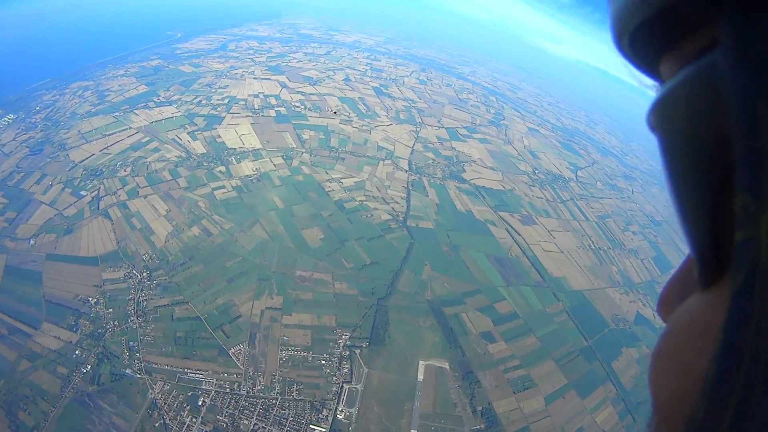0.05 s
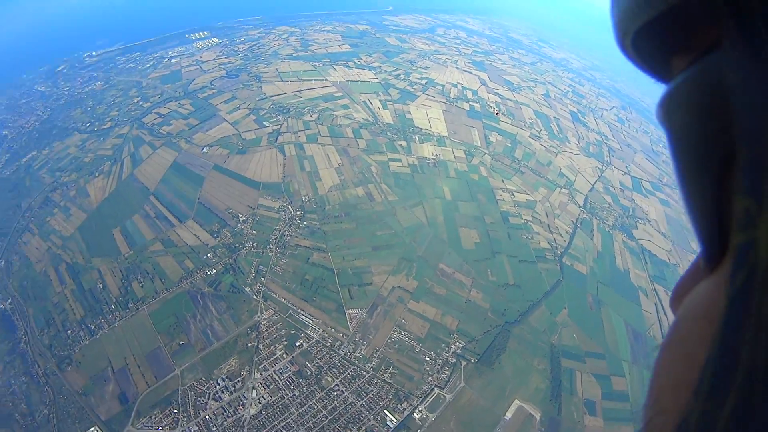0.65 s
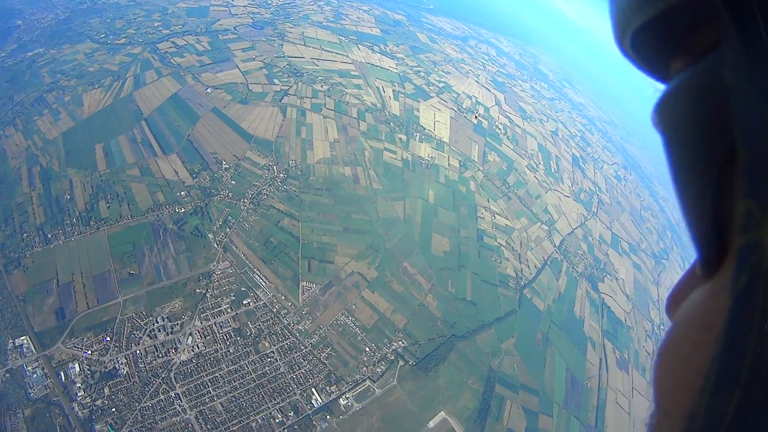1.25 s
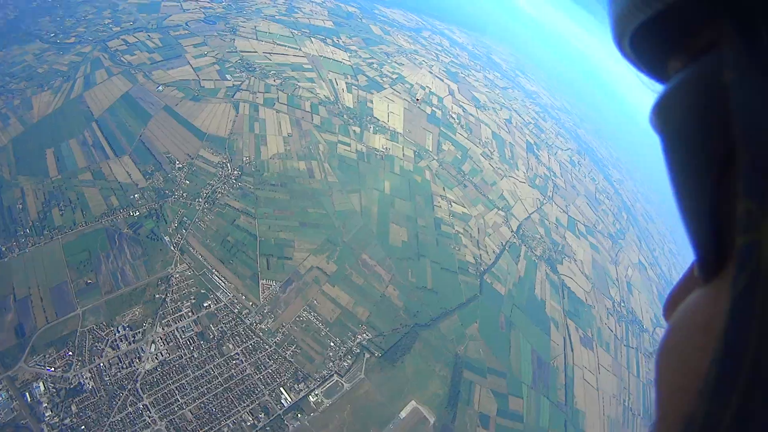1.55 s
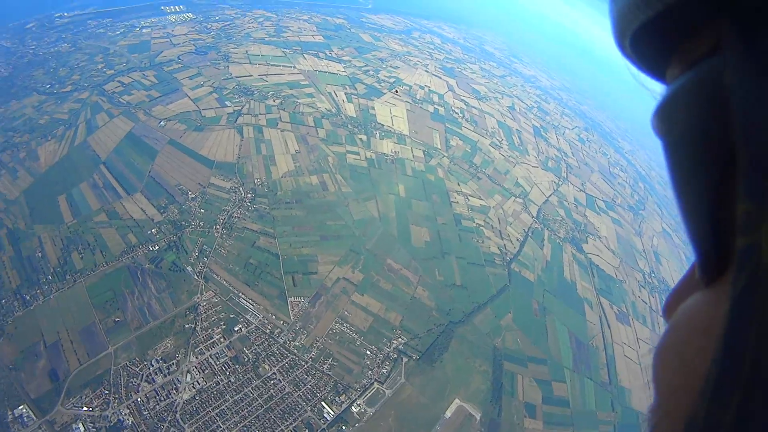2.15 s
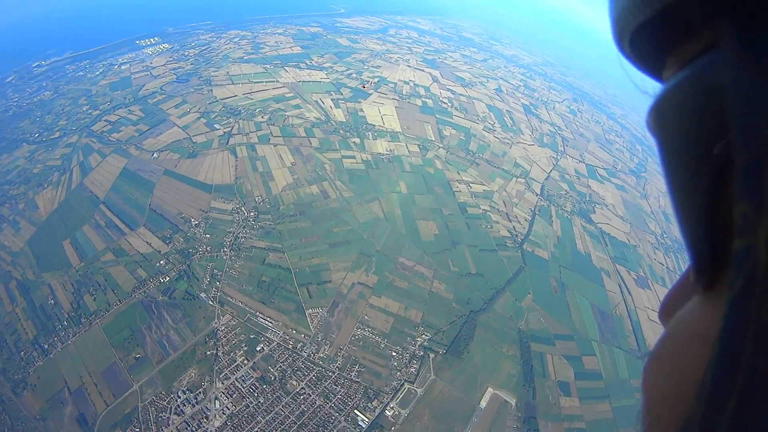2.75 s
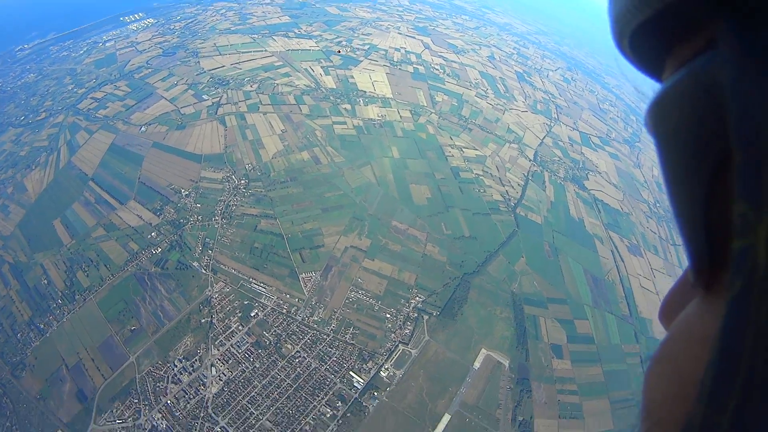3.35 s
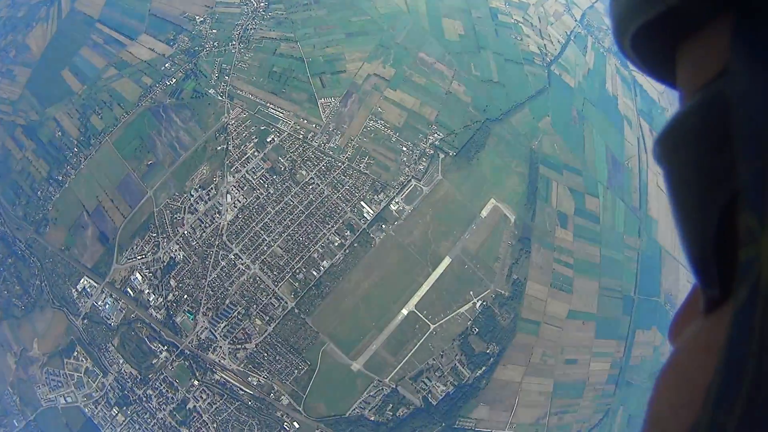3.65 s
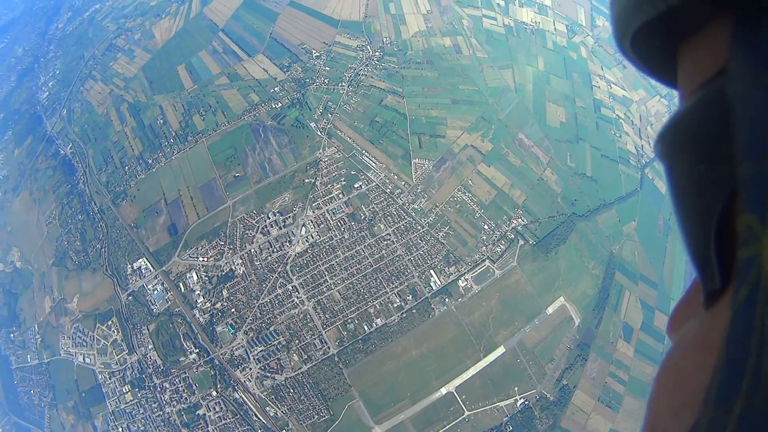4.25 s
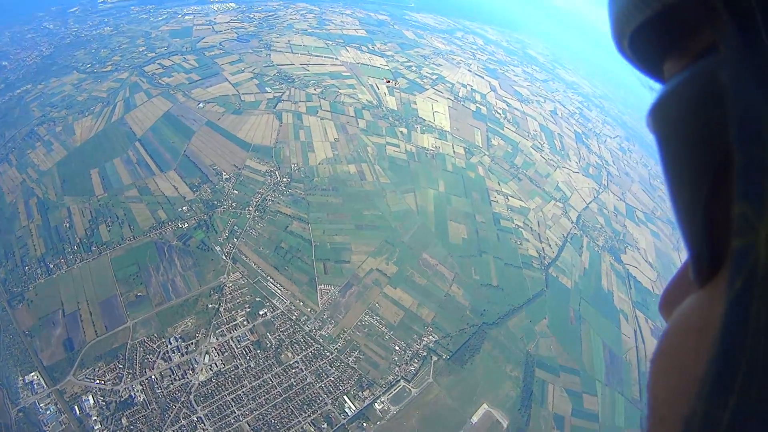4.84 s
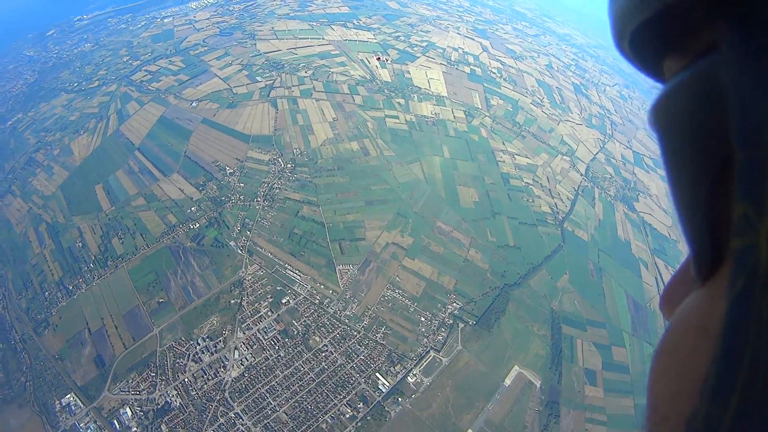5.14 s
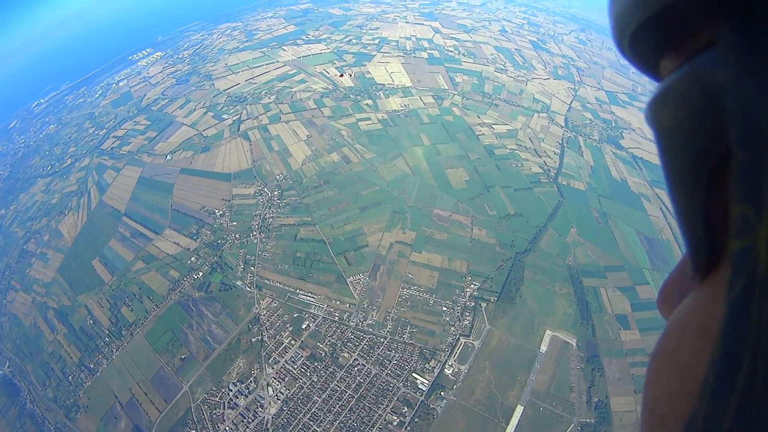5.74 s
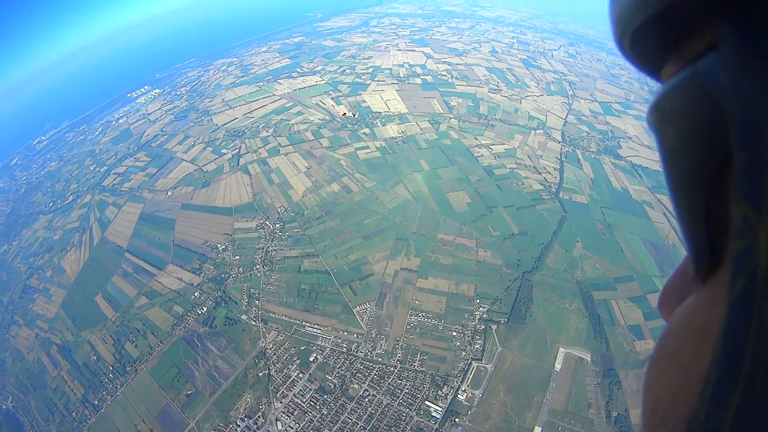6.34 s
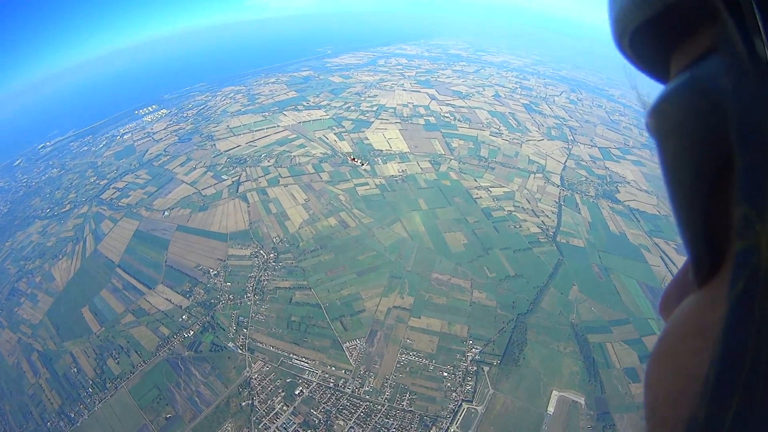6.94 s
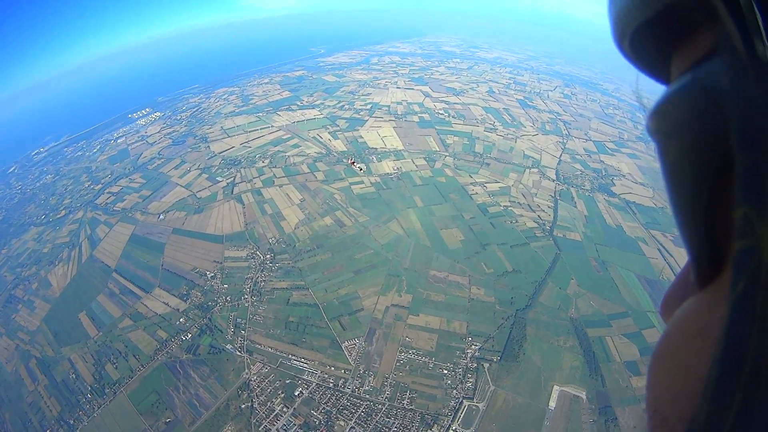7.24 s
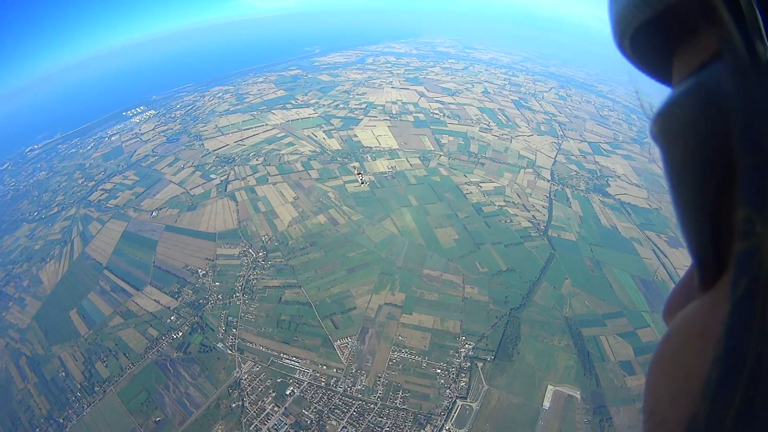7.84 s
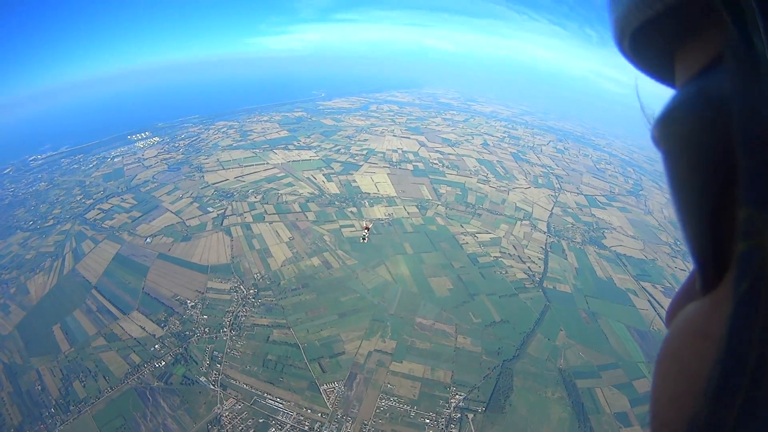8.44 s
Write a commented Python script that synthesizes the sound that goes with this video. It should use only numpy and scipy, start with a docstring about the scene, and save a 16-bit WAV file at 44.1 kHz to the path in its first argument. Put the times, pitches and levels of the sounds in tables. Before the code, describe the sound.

Air tears past a skydiver's helmet in a continuous roar, howling and hissing, with low throbbing that comes and goes.

```python
"""Wind on a helmet in freefall

Air tears past a helmet camera with two microphone ports. A cavity beside them resonates in the flow
and howls near 1.7 kHz. As the head turns, the flow separates into low buffeting and a throbbing wake
of shed vortices. Turbulence keeps up a broad rush, edge noise and hiss throughout."""
import sys
import numpy as np
from scipy import signal
from scipy.fft import irfft
from scipy.io import wavfile
from scipy.ndimage import uniform_filter1d

SR = 44100
rng = np.random.default_rng(int(sys.argv[2]) if len(sys.argv) > 2 else 0)


def generate_wav(signal):
    """Clip the signal to [-1, 1] and save it as 16-bit WAV at the path in sys.argv[1]."""
    frames = np.transpose(np.atleast_2d(signal))
    scaled = np.clip(frames, -1, 1) * 32767
    pcm = np.round(scaled).astype(np.int16)
    wavfile.write(sys.argv[1], SR, pcm)


N = 383229
T = np.arange(N) / SR
HZ = np.maximum(np.arange(N // 2 + 1) * SR / N, 1)


# Lowest cavity resonance: f/Hz, relative level/dB
HOWL_SPECTRUM = [(1100, -21), (1300, -16), (1420, -6.5), (1520, -1), (1740, -1.5), (1870, -4),
                 (2000, -10.5), (2200, -19.5), (2600, -32.5)]
# Strength of the howl: t/s, level/dB
HOWL_ENVELOPE = [(0.0, -19.5), (0.42, -19), (0.54, -14.5), (0.84, -21.5), (0.96, -15.5), (2.1, -17.0),
                 (2.28, -20.5), (2.56, -19.5), (3.22, -20.5), (3.58, -15.5), (4.54, -16.0), (4.64, -23),
                 (4.9, -16.0), (6.4, -15.5), (6.82, -20.5), (7.74, -18.5), (7.82, -21.5), (8.68, -22.5)]

def cavity_howl():
    """Flow-excited resonance: a cavity is blown near saturation, and the helmet shell drones faintly."""
    level_db = over_time(HOWL_ENVELOPE)
    broad = rms_one(signal.hilbert(irfft(random_bins() * spectral_gain(HOWL_SPECTRUM), N)))
    # the harder it is blown, the more it gathers on one note
    core = from_db(level_db + 5) * rms_one(resonance(centre_hz=1705, width_hz=150))
    cavity = at_ports(saturate(broad + core, ceiling=3.2), lead_rad=0.96, left_db=2.5)
    shell = at_ports(resonance(centre_hz=391.5, width_hz=67), lead_rad=0.57, left_db=1)
    return from_db(level_db) * (cavity + from_db(-24) * shell)


# Spells of separated flow: start/s, end/s, onset time/s, share of full separation
SEPARATIONS = [(-0.1, 0.476, 0.05, 0.91), (0.67, 0.98, 0.21, 0.89), (0.98, 1.535, 0.1, 0.32),
               (2.0, 3.516, 0.45, 0.98), (4.147, 4.41, 0.3, 0.5), (4.485, 4.99, 0.077, 0.88),
               (6.551, 8.9, 0.25, 0.8), (7.85, 8.9, 0.44, 0.27)]

def flow_separation():
    """Boundary-layer separation: 0 is smooth flow, 1 fully separated; overlapping spells add."""
    return sum(share * gate(start, end, onset_s, release_s=0.066)
               for start, end, onset_s, share in SEPARATIONS)


def reattachment_dip(depth_db=-3, fall_s=0.057, recover_s=0.096):
    """Flow reattachment: a brief dip in dB ends each spell, deeper after a fuller separation."""
    dip = np.zeros(N)
    for _, end, _, share in SEPARATIONS:
        fall = np.clip(1 + (T - end) / fall_s, 0, 1)
        recovery = np.exp(-np.maximum(T - end, 0) / recover_s)
        dip += share * fall * recovery
    return depth_db * dip


# Buffeting on the housing: f/Hz, relative level/dB
BUFFET_SPECTRUM = [(20, -15), (45, -17.5), (75, -8), (130, -3), (180, -1.5), (240, 0.5), (300, 0),
                   (350, 1.5), (420, -4.5), (520, -15.5), (900, -17)]
# Eddies local to each port: f/Hz, relative level/dB
RUMBLE_SPECTRUM = [(15, -2), (40, -5), (70, -18), (160, 4), (300, 6), (550, 0.5), (900, -14)]
# Response to the flow: level in smooth flow/dB, rise at full separation/dB, slope/(dB per dB of hiss)
BUFFET_RESPONSE = (-35.2, 12.97, 0.36)

def buffeting(separation, hiss_db, usual_hiss_db=-36, lumps_db=0.5):
    """Unsteady loading: separated flow beats on the housing in lumps; each port adds its own rumble."""
    smooth_db, rise_db, slope = BUFFET_RESPONSE
    level_db = smooth_db + rise_db * separation + slope * (hiss_db - usual_hiss_db)
    local_eddies = np.array([random_bins(), random_bins()])
    rumble = rms_one(irfft(local_eddies * spectral_gain(RUMBLE_SPECTRUM), N))
    gain = from_db(level_db + lumps_db * drift(rate_hz=24))
    return gain * (turbulence(BUFFET_SPECTRUM) + from_db(-14) * rumble)


# Spells when the shedding locks into a throb: start/s, end/s, f/Hz, level/dB
WAKE_THROBS = [(2.723, 3.026, 88.4, -23.5), (3.02, 3.486, 92.3, -28.5), (5.12, 6.501, 131, -39),
               (6.616, 6.92, 104, -30.5), (6.92, 7.38, 93, -25), (7.43, 7.579, 106.6, -26),
               (7.95, 8.9, 105, -26)]

def wake(separation, fade_s=0.069):
    """Vortex shedding: a wider wake sheds more slowly and loudly, except while a throb takes over."""
    free_hz = 117.7 - 14 * separation
    free_db = -45.5 + 6.5 * separation
    shed_hz, level_db = free_hz, free_db
    for start, end, throb_hz, throb_db in WAKE_THROBS:
        lock = gate(start, end, fade_s, fade_s)
        shed_hz = shed_hz + lock * (throb_hz - free_hz)
        level_db = level_db + lock * (throb_db - free_db)
    throb = saturate(resonance(shed_hz, width_hz=17), ceiling=1.6)
    return from_db(level_db) * at_ports(throb, lead_rad=0.23, left_db=1.0)


# Midrange rush of the airstream: f/Hz, relative level/dB
RUSH_SPECTRUM = [(60, -5), (150, -13), (260, -9.5), (400, -3.5), (520, 0.5), (640, 1.5), (740, 0), (850, 1),
                 (1250, .5), (1700, -4), (2200, -21), (3200, -40)]
# Strength of the rush: t/s, relative level/dB
RUSH_ENVELOPE = [(0.0, -25), (0.6, -28.5), (0.64, -25.5), (1.22, -30), (2.52, -32), (2.94, -27.0),
                 (3.46, -29.0), (3.76, -34.5), (4.54, -32), (4.62, -30), (5.16, -33), (5.92, -34.0),
                 (6.84, -28.5), (8.68, -26.5)]

def rush(separation, dip_db, gust):
    """Turbulent pressure fluctuation: a broad rush, wider in stereo as the flow separates."""
    level_db = over_time(RUSH_ENVELOPE) + 2.5 + dip_db + 1.5 * gust
    return from_db(level_db) * spread(turbulence(RUSH_SPECTRUM), side_db=0.2 + 1.1 * separation)


# Noise of the housing's edges: f/Hz, relative level/dB
EDGE_SPECTRUM = [(1600, -12), (2100, -2.5), (2400, 0.5), (2700, 1), (2950, -2), (3250, -1.5), (3550, -7),
                 (3900, -19.5), (4600, -16)]
# Strength of the edge noise: t/s, relative level/dB
EDGE_ENVELOPE = [(0.0, -28), (0.46, -31.5), (1.9, -30.5), (2.26, -37), (2.7, -31), (2.86, -32.5),
                 (3.04, -30.5), (3.94, -34), (4.34, -30.5), (4.58, -36.5), (4.94, -35), (4.98, -31.5),
                 (6.08, -32.0), (6.36, -34.5), (6.9, -31), (6.94, -34), (7.78, -29.5), (8.68, -31)]

def edge_noise(separation, dip_db, gust):
    """Edge scattering: air tearing over the housing's edges radiates a band around 3 kHz."""
    level_db = over_time(EDGE_ENVELOPE) + 0.53 + dip_db + 1.19 * gust
    return from_db(level_db) * spread(turbulence(EDGE_SPECTRUM), side_db=1.0 + 1.6 * separation)


# Hiss at the ports: f/Hz, relative level/dB
HISS_SPECTRUM = [(2500, 3), (3500, -0.5), (3950, 0), (4500, 0), (5000, 3), (5500, -1.5), (5950, -1),
                 (6600, -9), (6950, -6.5), (7500, -2.5), (8500, -8.5), (9400, -11.5), (10050, -9.5),
                 (11000, -17)]
# Hiss, louder the more squarely the airstream meets the ports: t/s, relative level/dB
HISS_ENVELOPE = [(0.0, -31), (0.6, -33.5), (0.78, -32.0), (1.24, -35.5), (3.32, -33.0), (3.94, -40.0),
                 (4.36, -35.0), (4.44, -37.5), (4.68, -36), (4.92, -38.5), (4.98, -35.5), (6.4, -36.0),
                 (7.66, -33), (8.68, -33.5)]

def hiss(level_db, gust):
    """Broadband excitation: fine eddies hiss, and a faint tone rings near 5 kHz, about 3 times the howl."""
    high_tone = at_ports(resonance(centre_hz=5030, width_hz=280), lead_rad=0.32, left_db=5.0)
    fine_eddies = from_db(0.42) * turbulence(HISS_SPECTRUM)
    return from_db(level_db + 1.19 * gust) * (fine_eddies + from_db(-11.5) * high_tone)


# Likeness of the two ports: f/Hz, coherence (clipped to 0-1 in use)
PORT_COHERENCE = [(35, 5), (90, 0.2), (250, 1.35), (430, .5), (750, 1), (1000, 0.36), (2200, 1.06),
                  (2700, 0.65), (3500, 0.34), (5100, 0.82), (6000, 0.2), (6900, 0.94), (7500, 1),
                  (8200, -0.5), (9400, 1.5), (11000, -0.9)]
# Lead of the left port: f/Hz, phase/rad
PORT_LEAD = [(120, -0.4), (280, 1.38), (380, 1.03), (480, 1.45), (680, 2), (1200, 1.6), (2100, 1.3),
             (2700, 3), (3200, 0.96), (3900, 3), (4850, 0.68), (6100, 0.34), (7400, -2.2), (9600, 2)]
# Left port minus right: f/Hz, level/dB
PORT_BALANCE = [(120, -0.5), (250, 0.5), (340, 5.5), (450, -1), (800, 1), (1200, 1.5), (2250, 3.5),
                (2800, 0.5), (3400, -0.7), (4500, -1), (5500, 2.5), (6900, 1.7), (8700, 0), (9800, -3)]

def turbulence(spectrum):
    """Partial coherence: large eddies cover both ports, small ones only one; their mean has rms 1."""
    coherence = np.clip(over_hz(PORT_COHERENCE), 0, 1)
    left = random_bins()
    shared = coherence * left * np.exp(-1j * over_hz(PORT_LEAD))
    right = shared + np.sqrt(1 - coherence ** 2) * random_bins()
    tilt = from_db(over_hz(PORT_BALANCE) / 2)
    ports = irfft(np.array([left * tilt, right / tilt]) * spectral_gain(spectrum), N)
    return ports / np.std(ports.mean(axis=0))


def at_ports(tone, lead_rad, left_db):
    """Phase and level difference: a tone is earlier and louder on the left; the mean has rms 1."""
    ports = np.real([tone * from_db(left_db), tone * np.exp(-1j * lead_rad)])
    return ports / np.std(ports.mean(axis=0))


def spread(ports, side_db):
    """Mid-side decomposition: set how much the ports differ, relative to what they share."""
    mid, side = ports.mean(axis=0), rms_one(ports[0] - ports[1])
    return mid + from_db(side_db) * side * [[1], [-1]]


def resonance(centre_hz, width_hz):
    """Random forcing: a narrow resonance stirred by turbulence wanders in amplitude and phase."""
    forcing = drift(width_hz) + 1j * drift(width_hz)
    envelope = signal.lfilter(*signal.butter(2, width_hz / (SR / 2)), forcing)
    return envelope * np.exp(2j * np.pi * np.cumsum(centre_hz * np.ones(N)) / SR)


def saturate(tone, ceiling):
    """Nonlinear saturation: an oscillation cannot outgrow the flow that feeds it, so peaks even out."""
    tone = rms_one(tone)
    return tone / np.sqrt(1 + np.abs(tone / ceiling) ** 2)


def drift(rate_hz):
    """Low-pass noise: a slow random fluctuation of rms 1."""
    return rms_one(irfft(random_bins() / (1 + (HZ / rate_hz) ** 2), N))


def random_bins():
    """White noise as a complex Gaussian spectrum."""
    return rng.standard_normal(len(HZ)) + 1j * rng.standard_normal(len(HZ))


def spectral_gain(spectrum):
    """Band-limited filter gain, silent past the ends of the table."""
    return from_db(over_hz(spectrum, beyond=-120))


def over_hz(points, beyond=None):
    """Interpolation of a table along log frequency."""
    hz, value = np.transpose(points)
    return np.interp(np.log(HZ), np.log(hz), value, left=beyond, right=beyond)


def over_time(points):
    """Linear interpolation of a table at every sample."""
    return np.interp(T, *np.transpose(points))


def gate(start, end, attack_s, release_s):
    """Trapezoidal window from 0 to 1, with ramps centred on start and end."""
    return np.clip(.5 + np.minimum((T - start) / attack_s, (end - T) / release_s), 0, 1)


def from_db(db):
    """Amplitude ratio of a level in decibels."""
    return 10 ** (np.asarray(db) / 20)


def rms_one(x):
    """Normalisation to an rms of 1."""
    return x / np.sqrt(np.mean(np.abs(x) ** 2))


def scene():
    """Superposition at two ports: separation drives buffeting, wake, stereo width and the dips."""
    separation, dip_db = flow_separation(), reattachment_dip()
    hiss_db = over_time(HISS_ENVELOPE) + dip_db
    helmet = cavity_howl() + buffeting(separation, hiss_db) + wake(separation)
    gust = drift(rate_hz=45)  # rush, edge noise and hiss flicker together
    airstream = rush(separation, dip_db, gust) + edge_noise(separation, dip_db, gust)
    return helmet + airstream + hiss(hiss_db, gust)


def record(dry, target_db=-14.0, squeeze=0.31, window_s=0.012, ceiling=0.69, cutoff_hz=11100):
    """Dynamic compression: fast gain control, then soft clipping of peaks and a steep treble cutoff."""
    power = uniform_filter1d(np.mean(dry ** 2, axis=0), int(window_s * SR))
    compressed = dry * from_db(squeeze * (target_db - 10 * np.log10(power)))
    rounded = compressed / (1 + (compressed / ceiling) ** 6) ** (1 / 6)
    return signal.sosfilt(signal.ellip(12, .1, 80, cutoff_hz, fs=SR, output="sos"), rounded)


dry = scene()
out = record(dry)
generate_wav(out)
```